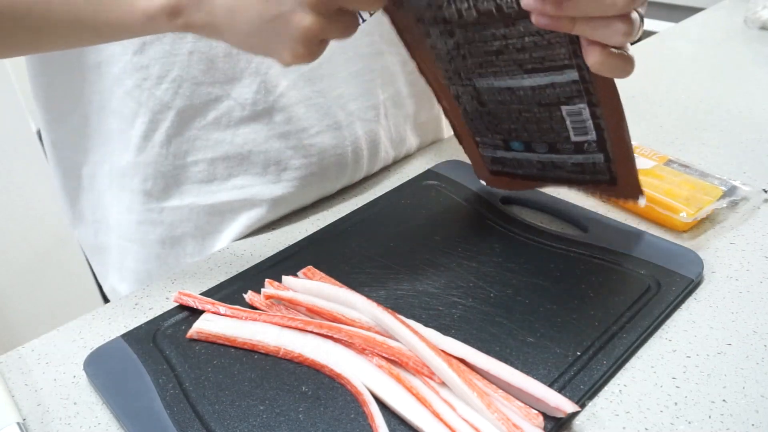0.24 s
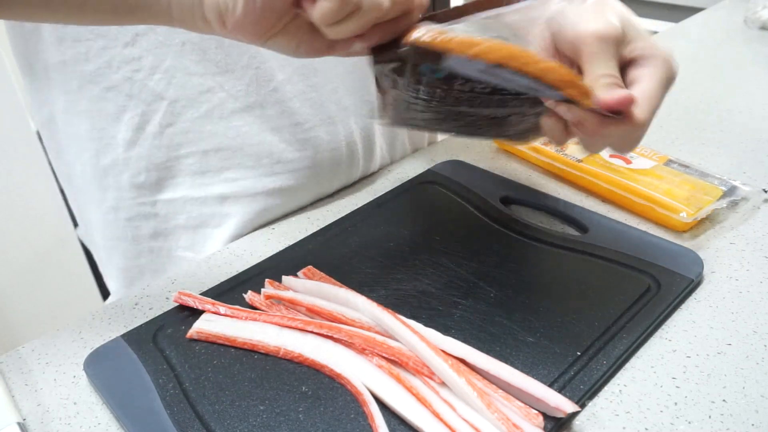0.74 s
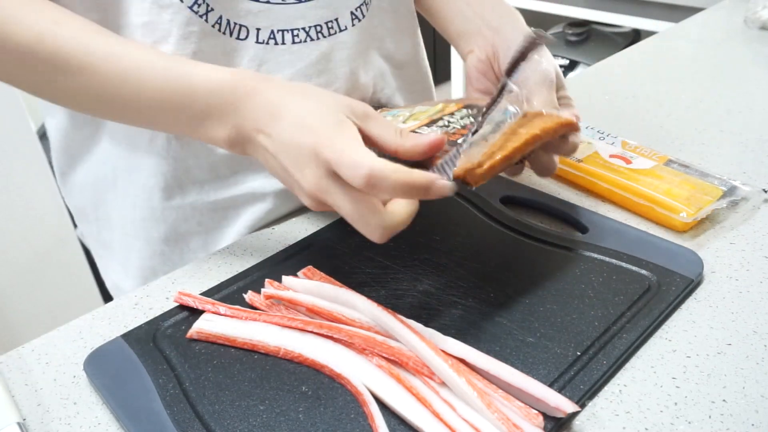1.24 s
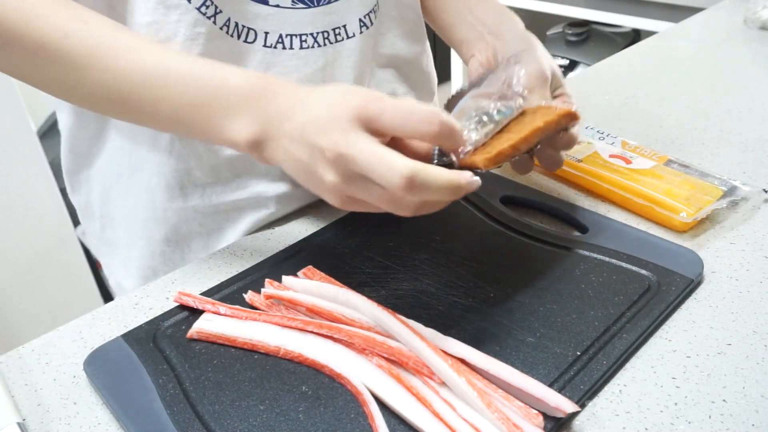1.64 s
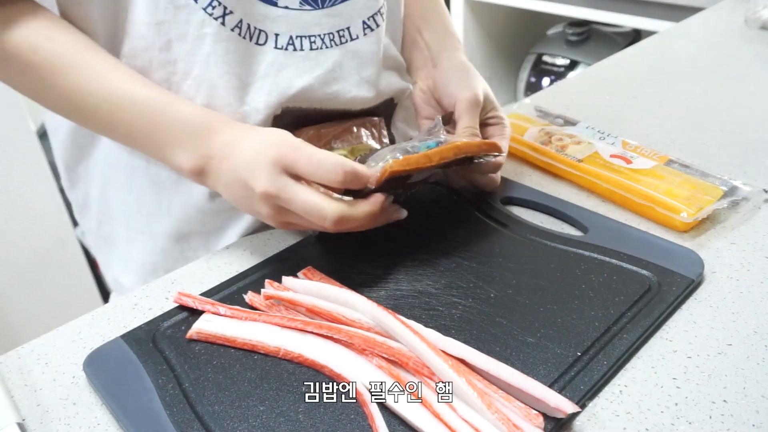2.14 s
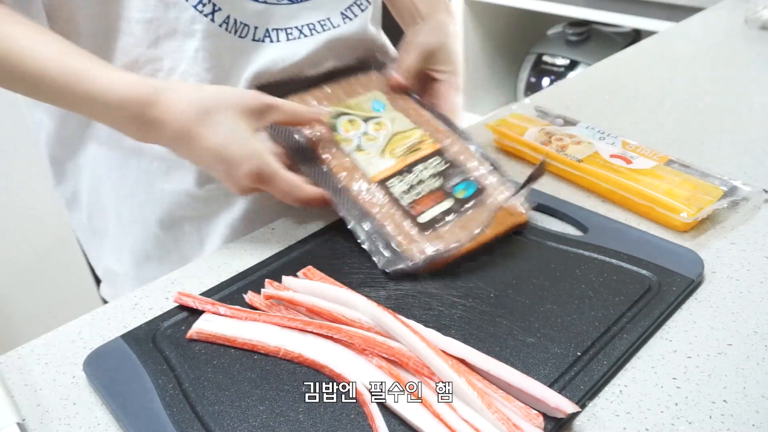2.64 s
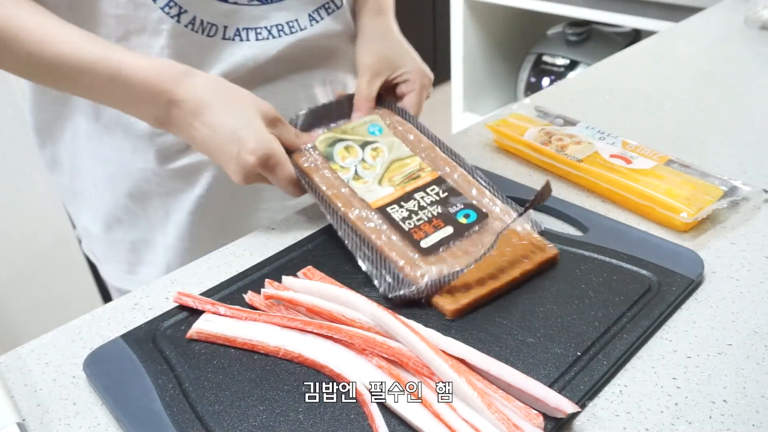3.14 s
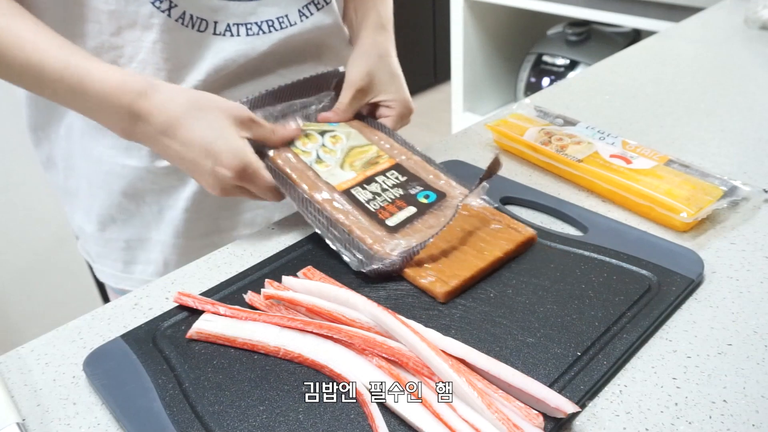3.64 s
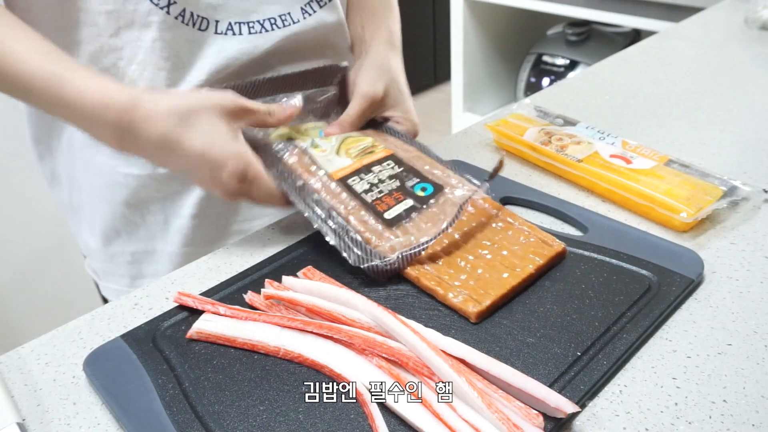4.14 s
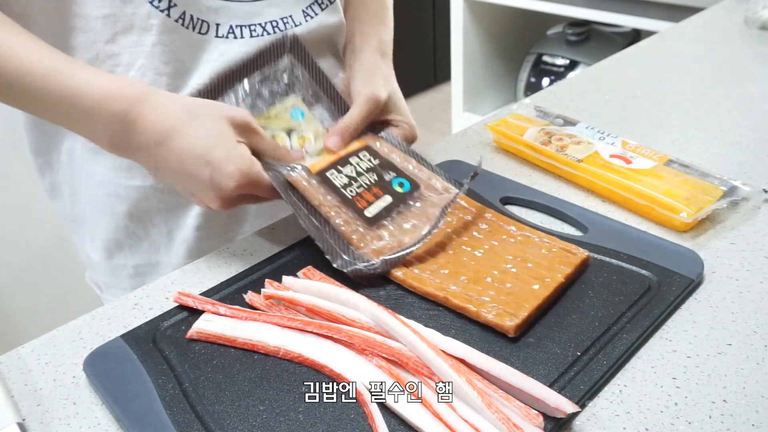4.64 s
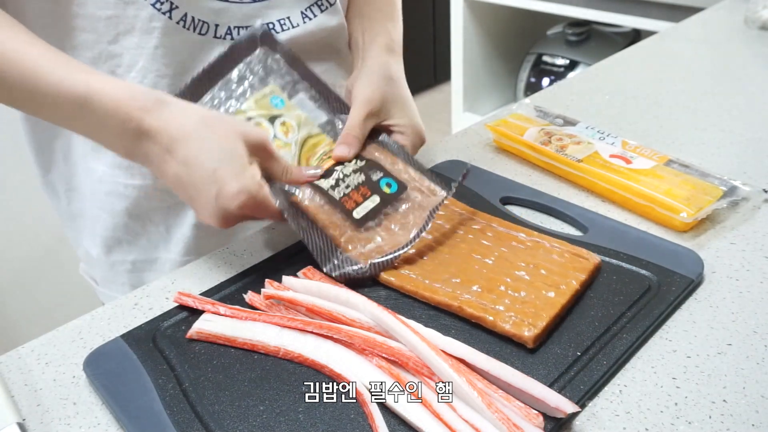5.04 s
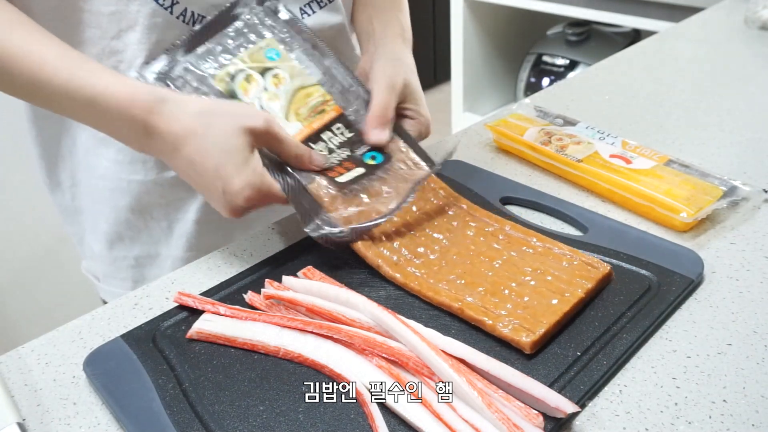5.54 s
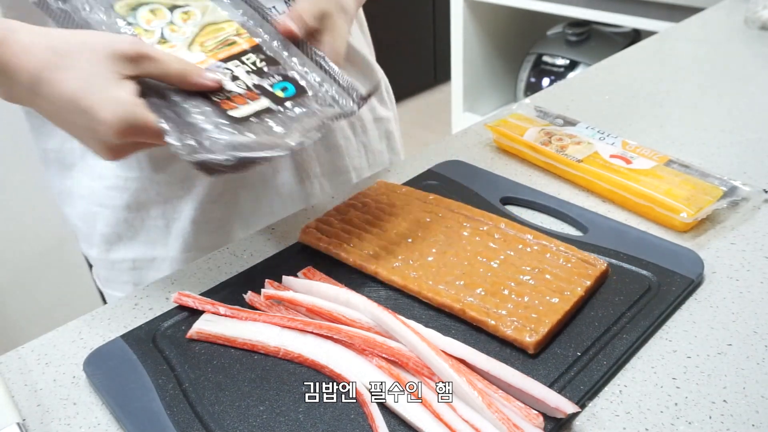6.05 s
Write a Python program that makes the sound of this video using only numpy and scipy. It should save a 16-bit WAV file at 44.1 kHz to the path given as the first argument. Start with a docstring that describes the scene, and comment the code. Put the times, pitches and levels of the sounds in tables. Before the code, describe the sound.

Hands work a stiff plastic food pack near the microphone. Quiet, separate clicks come first, then brief short squeaks and light bumps, then dense bright crackle and hollow pops from the bending tray as a wet slab slides free. It lands with a soft thud on a plastic board, leaving a light rustle, short room reflections and very faint air noise.

```python
"""Stiff plastic film of a ham pack snaps and crackles as it is peeled open and the slab squeezed onto a board.
Each snap rings a patch of film for a few cycles, with hollow flex and a bright fizz; the crackle is random
small creases that follow the load of the fingers. Snaps and crackle excite tuned resonances of the tray.
The wet slab drags as filtered noise, squeaks as wavering gliding tones, and bumps and flops as noise bursts
through board and slab filters. A small kitchen adds reflections, a low resonance and faint air noise."""
import sys
import numpy as np
from scipy import signal
from scipy.fft import rfft, irfft, next_fast_len
from scipy.io import wavfile

SR = 44100
rng = np.random.default_rng(int(sys.argv[2]) if len(sys.argv) > 2 else 0)


def store_wav(level_fs):
    """Save 16-bit WAV to argv[1]."""
    pcm = np.round(np.clip(np.atleast_2d(level_fs), -1, 1) * 32767)
    wavfile.write(sys.argv[1], SR, pcm.T.astype(np.int16))


N = 277389
TAPS = 2048  # samples in a filter click
BINS_HZ = np.fft.rfftfreq(TAPS, 1 / SR)

# sharp buckles of the film, the last as the slab slaps free:
# start_s, level_rel_db, patch_ring_hz, bright_crack_rel_db
SNAP_EVENTS = [(0.144, -40.5, 1840, -37), (0.2476, -31.5, 2030, -9.5), (0.4127, -30, 1920, -39),
               (0.4743, -29.5, 3220, -20), (0.498, -24.5, 3560, -19.5), (0.5142, -34.5, 1470, -30.0),
               (0.53, -31, 1380.0, -33), (0.5369, -32, 2060.0, -28), (0.5471, -13, 2930, -12),
               (0.5576, -21, 2700, -15), (0.5656, -30.5, 2030, 3), (0.572, -21, 3470, -13),
               (0.6091, -29.5, 2560.0, -28), (0.735, -18, 3270.0, -16), (0.888, -31.5, 2800.0, -14.5),
               (0.917, -23.5, 3020, -28), (1.0323, -27.5, 2150, -27), (1.119, -31.5, 2050, -13.5),
               (1.1678, -30.5, 2200, -28.0), (1.241, -27.5, 2140, -19.0), (1.427, -28.0, 2190, -21.5),
               (1.469, -32, 3400.0, -23.0), (1.55, -36.5, 2900, 0), (1.5599, -25.5, 2520, -11.5),
               (1.7394, -27.5, 2700, -11), (1.8255, -30.5, 2360.0, -17.5), (1.8491, -19.5, 2030, -30.0),
               (1.8852, -16.5, 1770, -23), (1.889, -17, 2150, -26), (1.9179, -11, 2770, -41),
               (1.973, -27.5, 1970, -13), (1.984, -20.5, 2560.0, -28), (1.9976, -15, 1830, -45),
               (2.079, -26, 1510, -24), (2.0837, -27, 1150, -37), (2.242, -34, 2650.0, 0),
               (2.2535, -25.5, 3080.0, -13), (2.3714, -13.5, 1690, -24), (2.4241, -21.5, 2250, -0.5),
               (2.511, -8.5, 2780, -23), (2.6832, -17.5, 2820, -23), (2.87, -19.5, 4020, -28),
               (2.9509, -26, 3020.0, -20.0), (2.985, -21.5, 3680, -30), (3.0373, -26, 2100.0, -32),
               (3.0679, -8.5, 2180, -43), (3.0801, -12, 2790.0, -23), (3.1695, -11, 2180, -25),
               (3.1783, -11.5, 1710, -33), (3.2101, -9.5, 2050, -22.5), (3.2223, -13, 2060, -24),
               (3.2391, -11.5, 2370, -20.5), (3.2499, -16, 1650, -41), (3.3486, -17.5, 2850, -12.5),
               (3.3725, -16.5, 1920, -37), (3.4552, -27, 2330, -33), (3.6044, -13.5, 3130, -15),
               (3.6612, -19, 2760.0, -21), (3.677, -18.5, 2750, -18.5), (3.704, -21.5, 3280, -32),
               (3.7759, -13.5, 2260, -20), (3.7854, -14.5, 1710, -37), (3.8049, -13, 3000, -16.5),
               (3.8357, -19.5, 1820, -22.0), (3.8724, -12, 2370, -16.5), (3.912, -17.5, 2190.0, -14),
               (3.9722, -20.5, 2050, -38), (4.008, -8.5, 2560.0, -26.5), (4.0996, -11, 2580, -22.5),
               (4.2369, -23, 3050, -44), (4.2703, -15.5, 2600, -14.5), (4.359, -12, 2750, -37),
               (4.3825, -18, 2280.0, -12.5), (4.5112, -9, 2450, -21), (4.5309, -12, 1840, -27),
               (4.5484, -13.5, 1770, -20), (4.5874, -16, 2940, -13), (4.6881, -22, 1950.0, -35),
               (4.7209, -21.5, 1700, -25.0), (4.7862, -27, 2400, -20), (4.8836, -20.0, 3080, -27),
               (4.9097, -21.5, 2200, -37), (4.9479, -19, 2600, -16.5), (5.0164, -24.0, 2870, -23),
               (5.0492, -21.5, 1870, -20.0), (5.1026, -16, 2290.0, -11.5), (5.1511, -14, 2500, -19),
               (5.2061, -17, 2060.0, -25), (5.2321, -16.5, 2120, -46), (5.454, -10.5, 2430, -26.5),
               (5.5463, -31, 2240.0, -35), (5.5568, -16.5, 1890, -27), (5.6086, -24, 2160, -21),
               (5.8973, -7.5, 1640.0, -41), (5.9008, -10, 1900, -46)]
# pulls and squeezes of the fingers; taut, dry film crackles brighter: start_s, held_s, load_db, treble_rel_db
FINGER_SQUEEZES = [(0, 0.014, -43, -1), (0.542, 0.014, -39.5, 12.5), (1.855, 0.079, -36.5, -6),
                   (2.226, 0.071, -41.5, 6), (2.42, 0.085, -69, 14), (2.656, 0.035, -49.5, 19),
                   (2.826, 0.15, -67, 14), (3.051, 0.023, -34, 0), (3.158, 0.011, -24.5, -11),
                   (3.335, 0.05, -65, 11.5), (3.55, 0.036, -27, 6.5), (3.77, .16, -40.5, -0.5),
                   (3.998, 0.066, -39.5, -1), (4.257, 0.16, -39.5, 5.5), (4.51, 0.17, -41.5, -2.5),
                   (4.843, 0.026, -32, 11), (5.071, 0.094, -33, -1), (5.258, 0.081, -34.5, -0.5),
                   (5.414, 0.013, -25.5, 0), (5.549, 0.054, -38, -37), (5.811, 0.027, -28, -22),
                   (6.07, 0.068, -57, 5.5)]


def gain_of(db):
    """Decibels to amplitude gain."""
    return 10 ** (np.asarray(db) / 20)


def unit(x):
    """Scales to energy 1 along the last axis."""
    return x / np.sqrt(np.sum(x ** 2, -1, keepdims=True) + 1e-20)


def read(points, hz):
    """Interpolates a table on a logarithmic frequency axis."""
    point_hz, value = np.transpose(points)
    return np.interp(np.log(hz + 1), np.log(point_hz + 1), value)


def add(mix, start_s, sound):
    """Mixes a sound in at start_s, cut at the end of the mix."""
    start = max(round(start_s * SR), 0)
    part = mix[..., start:][..., :sound.shape[-1]]
    part += sound[..., :part.shape[-1]]


def click(gain):
    """Minimum-phase click with this spectrum, floored 80 dB below its peak; energy 1."""
    log_gain = np.log(np.maximum(gain / gain.max(), 1e-4))
    circle = np.concatenate([log_gain, log_gain[-2:0:-1]])
    spectrum = np.exp(signal.hilbert(circle).conj())[:len(gain)]
    return unit(irfft(spectrum))


def coloured(x, gain_at):
    """Filters by a gain that is a function of frequency."""
    size = next_fast_len(x.shape[-1] + TAPS)
    spectrum = rfft(x, size) * gain_at(np.fft.rfftfreq(size, 1 / SR))
    return irfft(spectrum, size)[..., :x.shape[-1]]


def patch(hz, q):
    """Resonance magnitude of one patch of film or a wobbling slab."""
    return 1 / np.sqrt(1 + (q * (BINS_HZ / hz - hz / (BINS_HZ + 1))) ** 2)


def air():
    """Steady, faint room noise."""
    air_colour = [(25, -14.5), (120, 2.5), (300, -5), (900, -6.5), (1600, -6), (4000, -12.5), (11000, -22)]  # relative spectrum: freq_hz, density_db
    hiss = coloured(rng.standard_normal((2, N)), lambda hz: gain_of(read(air_colour, hz)))
    return gain_of(-59.5) * np.sqrt(N) * unit(hiss)


def kitchen(x, early_db=-9, early_decay_s=0.0046, tail_db=-7.0):
    """Quick reflections off counter and body, then the short tail of the room, treble dying sooner."""
    decay_times = [(3000, 0.33), (10000, 0.26)]  # freq_hz, t60_s
    t = np.arange(SR // 2) / SR
    signs = rng.choice([-1, 1], (2, 2, len(t)))
    present = rng.random((2, 2, len(t))) < 3000 / SR  # 3000 reflections per second
    taps = signs * present * (t > .003)
    early = unit(taps[0] * np.exp(-t / early_decay_s))
    hz, age_s, z = signal.stft(taps[1], SR, nperseg=256)
    fade = gain_of(-60 * age_s / read(decay_times, hz)[:, None])
    tail = signal.istft(z * fade, SR, nperseg=256)[1][:, :len(t)]
    echo = gain_of(early_db) * early + gain_of(tail_db) * unit(tail)
    return signal.oaconvolve(x, echo, axes=1)[:, :N]


def boom(x, hz=203, q=16, db=2):
    """One low resonance of the room hums along with the sound."""
    return x + gain_of(db) * signal.lfilter(*signal.iirpeak(hz, q, SR), x)


def thuds(board_db=17, slab_db=19, wobble_db=17, soft_s=0.024, q=3):
    """Noise-burst contacts drive a dull push, a rough wobble and, if brisk, the board's short ring."""
    landings = [(1.999, -35.5, 0.015, 290), (2.029, -40, 0.033, 121), (4.405, -44.5, 0.0067, 152),
                (5.896, -30, 0.0082, 217), (5.908, -29, 0.015, 560), (5.972, -39, 0.027, 216),
                (6.011, -46.5, 0.053, 111)]  # slab bumps and landings: start_s, level_rel_db, contact_s, wobble_hz
    board_modes = [(513, -28, 0.27), (1080, 4, 0.093), (1181, 0, 0.17)]  # freq_hz, level_rel_db, t60_s
    slab_colour = [(40, -28), (100, -1.5), (520, -1.5), (2000, -17)]  # dull push of the soft slab: freq_hz, level_rel_db
    out, t = np.zeros(N), np.arange(SR // 4) / SR
    ring = unit(sum(gain_of(db - 60 * t / t60_s) * np.sin(2 * np.pi * hz * t)
                    for hz, db, t60_s in board_modes))
    push = click(gain_of(read(slab_colour, BINS_HZ)))
    for start_s, db, contact_s, wobble_hz in landings:
        envelope = np.exp(-t / contact_s) * np.minimum(4 * t / contact_s, 1)
        force = unit(rng.standard_normal(len(t)) * envelope)
        brisk = np.exp(1 / 2 - (contact_s / soft_s) ** 2)
        wobble = click(patch(wobble_hz, q))
        for body, body_db, share in ((ring, board_db, brisk), (push, slab_db, 1), (wobble, wobble_db, 1)):
            sound = unit(signal.fftconvolve(force, body))
            add(out, start_s, share * gain_of(db + body_db) * sound)
    return out


def squeaks(wavers=7):
    """Uneven slips ring an air pocket whose size changes; a long, slow slip holds a purer tone."""
    slip_events = [(0.13, 0.33, 1755, 1675, -73.5), (0.095, 0.44, 567, 541, -76),
                   (1.276, 0.07, 1740, 1715, -60.5), (2.081, 0.07, 1194, 1136, -51),
                   (2.165, 0.031, 927, 790, -48.5), (2.364, 0.029, 931, 834, -35.5)]  # film on wet ham or fingers: start_s, length_s, start_hz, end_hz, level_db
    out = np.zeros(N)
    for start_s, length_s, start_hz, end_hz, db in slip_events:
        slips = rng.standard_normal((SR, 2)) @ [1, 1j]
        r = np.exp(-np.pi * wavers / length_s / SR)
        u = np.linspace(0, 1, int(length_s * SR))
        waver = signal.lfilter([1], np.poly([r, r]), slips)[-len(u):]
        pitch_hz = start_hz + (end_hz - start_hz) * u
        tone = (waver * np.exp(2j * np.pi * np.cumsum(pitch_hz) / SR)).real
        envelope = np.minimum(u / 0.08, 1) * (1 - u ** 2)
        add(out, start_s, gain_of(db) * np.sqrt(len(u)) * unit(tone * envelope))
    return out


def pressing(heights, attack_s=.016, release_s=.02):
    """Each squeeze builds quickly to its height, is held and lets go."""
    out, t = np.zeros(N), np.arange(SR // 2) / SR
    for (start_s, held_s, *_), height in zip(FINGER_SQUEEZES, heights):
        rise = np.minimum(t / attack_s, 1)
        release = np.exp(-np.maximum(t - held_s, 0) / release_s)
        add(out, start_s, height * rise * release)
    return out


def strain(avalanche_db=-25, reach_s=0.0035, clump_db=2.5):
    """Film load: steady grip plus squeezes in uneven jerks; each buckle leaves a short surge behind it."""
    # grip between squeezes, eased for a moment to take a new hold: time_s, load_db
    grip_points = [(0, -89), (.36, -101), (.86, -79), (1.0, -57.5), (1.45, -54), (1.7, -60.5), (2.17, -57),
                   (2.58, -41), (2.78, -53), (3.25, -41), (4.13, -35.5), (4.21, -61), (4.3, -39.5),
                   (5.33, -44), (6.0, -49), (6.29, -58)]
    time = np.arange(N) / SR
    jerk_points = np.clip(rng.standard_normal(400), -2, 1.5)
    jerks = np.interp(time, np.linspace(0, time[-1], 400), jerk_points)
    grip = gain_of(np.interp(time, *np.transpose(grip_points)))
    squeezes = pressing(gain_of([db for _, _, db, _ in FINGER_SQUEEZES]))
    work = (grip + squeezes) * gain_of(clump_db * jerks)
    age = time[:SR // 10] / reach_s
    for start_s, db, *_ in SNAP_EVENTS:
        add(work, start_s, gain_of(db + avalanche_db) * age * np.exp(1 - age))
    return work


def slide(level_db=-28, follows=0.74):
    """The wet slab drags softly in its sleeve as the load on the pack grows."""
    slide_colour = [(60, -22), (200, -1.5), (380, -0.5), (800, 9.5), (1300, -10), (3000, -12)]  # relative spectrum: freq_hz, density_db
    rub = coloured(rng.standard_normal(N), lambda hz: gain_of(read(slide_colour, hz)))
    return gain_of(level_db) * np.sqrt(N) * unit(rub) * strain() ** follows


def pack_ring(x, sealed_db=-14, bend=0.019, open_s=1.85):
    """Creases ring the stiff tray: damped while the pack is sealed, shifting as the hands bend it."""
    tray_modes = [(1060, 180, 3.5), (1282, 96, -2.5), (2190, 19, -4)]  # freq_hz, q, level_rel_db
    time, out = np.arange(N) / SR, x
    free = gain_of(np.interp(time, [open_s, open_s + .5], [sealed_db, 0]))
    for hz, q, db in tray_modes:
        drift = np.interp(time, np.linspace(0, time[-1], 20), rng.uniform(-1, 1, 20))
        turn = np.exp(2j * np.pi * np.cumsum(hz * (1 + bend * drift)) / SR)
        r = np.exp(-np.pi * hz / q / SR)
        # shift the mode to 0 Hz, smooth, shift back
        ring = 2 * (turn * signal.lfilter([1 - r], [1, -r], x / turn + 1e-18)).real
        out = out + gain_of(db) * free * ring
    return out


def flutter(decay_s, scatter_db, apart=.55):
    """A jolt, then waves that bounce about in the sheet and reach the two ports a little differently."""
    t = np.arange(TAPS // 2) / SR
    noise = rng.standard_normal((3, len(t)))
    envelope = np.exp(-t / decay_s) * np.minimum(t / 0.00091, 1)
    waves = (noise[0] + apart * noise[1:]) * envelope
    return unit((t == 0) + gain_of(scatter_db) * unit(waves))


def crackle(level_db=-4.5, per_s=330, spread_db=3.0, rub_db=-13, treble_hz=5000, slack_db=-2.0, count=14):
    """Small creases give way at random, each with its own ring, over the soft rub of fingers and slab."""
    crackle_colour = [(200, -34.5), (350, -14), (800, -17), (2400, -3.5), (5500, -8.5), (11000, -10.5)]  # relative spectrum: freq_hz, density_db
    work = strain()
    # a light load rustles evenly, a hard one sets off creases of all sizes
    hard = np.minimum(work / work.mean(), 1) ** .5
    chance, size, sign = rng.random(N), rng.exponential(1, N), rng.choice([-1, 1], N)
    size_gain = gain_of(spread_db * hard * (np.minimum(size, 3) - 2.5))
    creases = unit((chance < per_s / SR) * sign * size_gain) * np.sqrt(N) * work
    which = rng.integers(0, count, N)
    colour = gain_of(read(crackle_colour, BINS_HZ))
    rub = gain_of(rub_db) * work * rng.standard_normal((2, N))
    out = signal.oaconvolve(rub, click(colour)[None], axes=1)[:, :N]
    for k, hz in enumerate(np.geomspace(850, 4000, count)):
        sharp = .3 if k % 4 == 1 else .02  # a few creases crack across the band, most only ring
        shape = click(colour * (sharp + patch(hz, q=2.3) ** 2))
        sheet = flutter(decay_s=.003, scatter_db=-6)
        grain = signal.fftconvolve(shape[None], sheet, axes=1)[:, :TAPS // 2]
        for i in np.flatnonzero((which == k) & (creases != 0)):
            add(out, i / SR, creases[i] * grain)
    treble = coloured(out, lambda hz: 1 - 1 / (1 + (hz / treble_hz) ** 6))
    taut = gain_of(slack_db + pressing([db for *_, db in FINGER_SQUEEZES]))
    return gain_of(level_db) * (out + (taut - 1) * treble)


def snaps(level_db=11.5, flex_db=-15, flex_db_per_octave=-14, crack_db=11, q=1.024, fizz_s=0.0015,
          scatter_db=-1.0):
    """A buckle rings its patch; low patches also flex the hollow pack; the running crease fizzes brightly."""
    # relative spectra of ringing film, hollow flex and bright crack: freq_hz, level_rel_db
    film_colour = [(150, -49), (700, 0), (2000, 4), (3500, 5.5), (6000, 0), (11000, -36)]
    flex_colour = [(120, -34), (450, 2), (850, 20), (1250, 13), (5000, -6)]
    crack_colour = [(1000, -40), (4000, -10), (11000, -11.5)]
    out = np.zeros((2, N))
    film, flex, crack = (unit(gain_of(read(colour, BINS_HZ)))
                         for colour in (film_colour, flex_colour, crack_colour))
    crease = click(crack)[None]
    for start_s, db, hz, bright_db in SNAP_EVENTS:
        octaves = np.log2(hz / 2400)
        flexing = flex * gain_of(flex_db + flex_db_per_octave * octaves)
        shape = click(np.hypot(unit(film * patch(hz, q) ** 2), flexing))
        sheet = flutter(decay_s=6 / hz, scatter_db=scatter_db)  # large, low patches shake for longer
        ring = signal.fftconvolve(shape[None], sheet, axes=1)
        sizzle = signal.fftconvolve(crease, flutter(decay_s=fizz_s, scatter_db=8), axes=1)
        add(out, start_s, gain_of(db + level_db) * (ring + gain_of(bright_db + crack_db) * sizzle))
    return out


def scene(wide_hz=450):
    """The pack is handled near a two-port microphone; the room's bass is nearly alike at both ports."""
    port_phase = [(200, 0.4), (3000, 0.74), (5300, 1.72), (11000, 0.036)]  # freq_hz, left_lead_rad
    port_balance = [(250, 0), (600, -3.5), (3000, -5.5), (7000, -1.5)]  # freq_hz, left_minus_right_db
    film = pack_ring(snaps() + crackle())
    near = boom(film + thuds() + slide() + squeaks())
    side = np.array([[.5], [-.5]])  # left, right
    direct = coloured(near, lambda hz: np.exp(1j * side * read(port_phase, hz))
                      * gain_of(side * read(port_balance, hz)))
    far = kitchen(near) * gain_of(side * -2.2) + air()  # echoes 2.2 dB weaker on the left
    common = far.mean(0)
    width = coloured(far - common, lambda hz: (hz + 60) / (hz + wide_hz))
    return direct + common + width


def record(dry):
    """Linear-phase band limit at 11150 Hz."""
    lowpass = signal.firwin(301, 11150, window=("kaiser", 8), fs=SR)
    return signal.oaconvolve(dry, lowpass[None], "same", axes=1)


dry = scene()
out = record(dry)
store_wav(out)
```